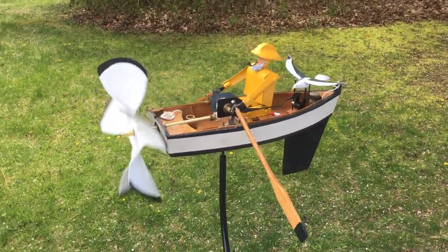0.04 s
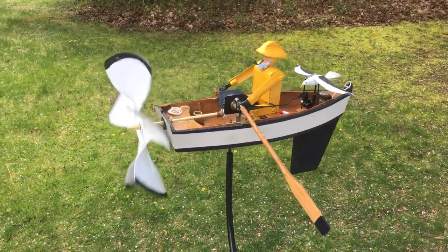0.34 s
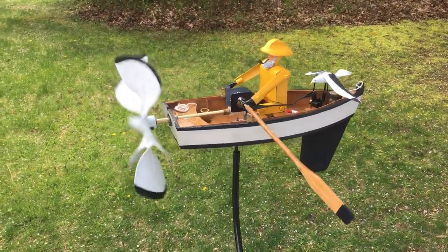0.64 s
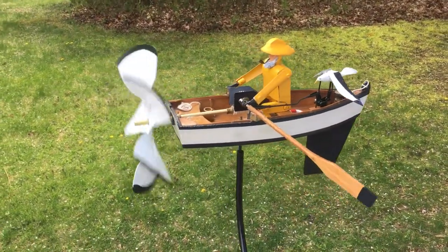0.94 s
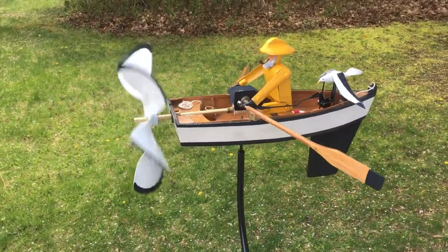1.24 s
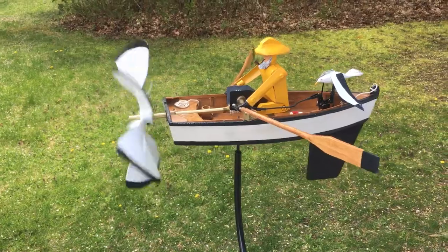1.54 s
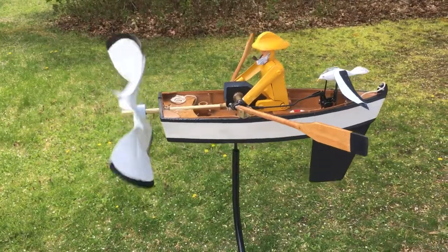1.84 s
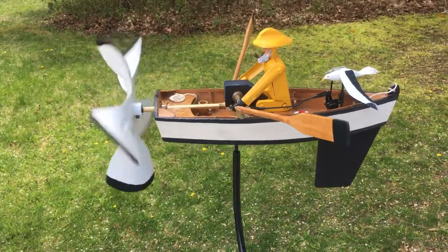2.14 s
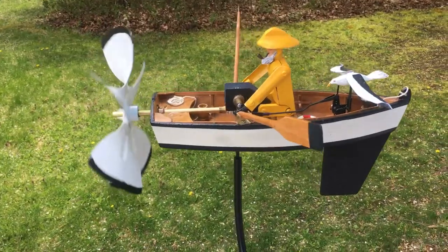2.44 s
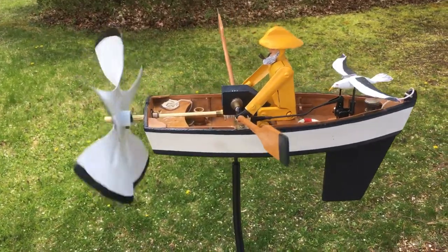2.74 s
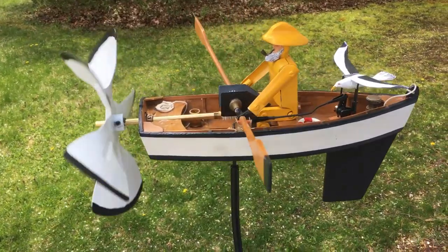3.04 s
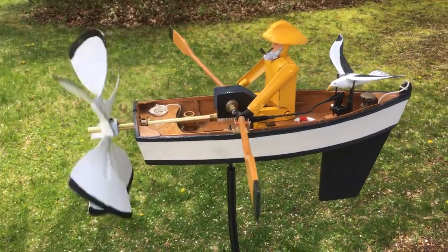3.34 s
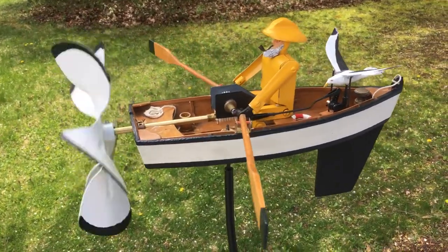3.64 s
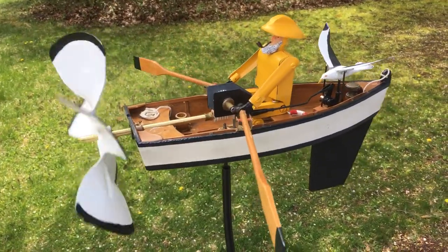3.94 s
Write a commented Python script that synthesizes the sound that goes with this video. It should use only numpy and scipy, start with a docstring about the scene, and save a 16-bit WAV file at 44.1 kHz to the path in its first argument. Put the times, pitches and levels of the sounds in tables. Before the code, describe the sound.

Gusty wind rumbles on the microphone, with faint ticks from a small wooden wind toy.

```python
"""On a lawn, one microphone in uneven wind: the harder it blows, the louder and brighter the rumble.
From the start a small wooden wind toy ticks faintly close by, with small birds and distant trees behind.
From 0.7 s single eddies slap the microphone's port, and near 1.4 s one sharp pop hits it.
Towards the end the wind eases and the tyre hiss of far traffic draws nearer."""
import sys
import numpy as np
from scipy import signal
from scipy.io import wavfile
from scipy.ndimage import uniform_filter1d

SR = 44100
rng = np.random.default_rng(int(sys.argv[2]) if len(sys.argv) > 2 else 0)


def dump_mix(stems):
    """Bounce the given channels to the path in sys.argv[1] as a 16-bit WAV at rate SR."""
    frames = np.atleast_2d(stems).T  # one column per channel
    limited = np.clip(frames, -1, 1)  # hard clip at full scale
    pcm = np.round(limited * 32767).astype(np.int16)
    wavfile.write(sys.argv[1], SR, pcm)


N = 176400
T = np.arange(N) / SR

# Buffeting and deep rumble on the microphone at mean wind: f/Hz, band level/dB
BUFFET_SPECTRUM = [(100, -35), (150, -23.5), (220, -25.5), (320, -34), (450, -52.5), (640, -65), (900, -66),
                   (1300, -78), (2000, -89.5)]
RUMBLE_SPECTRUM = [(28, -51), (40, -39), (56, -28.5), (80, -26.5), (113, -29), (160, -42.5), (230, -61)]
# Strength of the gusts and of the rumble, read against the means below: t/s, level/dB
GUST_CURVE = [(0.0, -34.5), (0.12, -28), (0.19, -41.5), (0.26, -26), (0.33, -33), (0.5, -23), (0.58, -38.5),
              (0.68, -19), (0.9, -18.5), (0.95, -35), (0.98, -20.5), (1.06, -14.5), (1.11, -31.5),
              (1.15, -12), (1.17, -30), (1.22, -17), (1.3, -25.5), (1.31, -21), (1.5, -19.5), (1.51, -13.5),
              (1.56, -21), (1.75, -18.5), (1.83, -48.5), (1.88, -21), (1.9, -31), (1.92, -18.5),
              (1.97, -40), (2.03, -21.5), (2.07, -34.5), (2.1, -31.5), (2.17, -15.5), (2.23, -33.5),
              (2.31, -47), (2.35, -19), (2.37, -28), (2.46, -21), (2.51, -30), (2.54, -24.5), (2.57, -41),
              (2.65, -17), (2.75, -30), (2.85, -13.5), (2.86, -21.5), (3.01, -23.5), (3.04, -46),
              (3.13, -24), (3.19, -37), (3.22, -24.5), (3.25, -48), (3.27, -20.5), (3.31, -21.5),
              (3.33, -34), (3.42, -19), (3.45, -35), (3.61, -44.5), (3.63, -27.5), (3.72, -55), (3.78, -23),
              (3.81, -44), (4.0, -77)]
RUMBLE_CURVE = [(0.0, -26.5), (0.14, -18), (0.19, -32), (0.26, -15.5), (0.3, -29.5), (0.43, -25.5),
                (0.49, -17), (0.59, -33.5), (0.63, -18.5), (0.78, -14.5), (0.96, -38.5), (0.98, -15.5),
                (1.07, -16), (1.18, -31.5), (1.25, -15.5), (1.28, -30.5), (1.35, -14), (1.48, -24),
                (1.53, -12), (1.59, -41.5), (1.65, -17.5), (1.68, -24.5), (1.73, -11), (1.83, -35),
                (1.88, -17), (1.98, -28.5), (2.02, -14), (2.05, -28), (2.24, -19), (2.27, -28),
                (2.41, -22.5), (2.44, -29), (2.47, -15), (2.55, -22.5), (2.68, -21), (2.74, -21),
                (2.83, -12), (3.0, -20), (3.04, -27.5), (3.16, -17.5), (3.25, -30.5), (3.27, -20.5),
                (3.34, -26), (3.42, -16), (3.49, -30), (3.62, -28), (3.66, -20), (3.71, -35), (3.91, -25.5),
                (4.0, -42.5)]
MEAN_GUST_DB, MEAN_RUMBLE_DB = -20, -22.5
# Single eddies on the port: t/s, relative level/dB, f/Hz, roundness (rounder has less treble)
EDDY_SLAPS = [(.667, -26.5, 420, 5.5), (.7635, -17, 608, 27), (0.785, -10.5, 320, 3.4),
              (0.857, -21, 400, 6.7), (0.982, -19, 380, 8.2), (1.006, -14, 580, 4.4),
              (1.046, -11, 430, 6.6), (1.086, -19, 400, 11), (1.139, -18.5, 450, 6.2),
              (1.195, -18, 440, 5.3), (1.365, -16.5, 345, 5.6), (1.483, -19, 440, 60),
              (1.518, -13, 500, 5.4), (1.625, -13.5, 480, 4.8), (1.633, -13, 416, 10), (1.743, -18, 480, 4),
              (1.757, -15, 360, 21), (1.918, -21, 400, 9), (2.027, -19.5, 426, 7.6),
              (2.147, -26.5, 420, 4.5), (2.346, -25, 425, 6.5), (2.655, -18, 480, 6.5),
              (2.845, -13.5, 330, 1.73), (2.992, -21.5, 420, 7), (3.49, -32, 342, 5),
              (3.603, -32, 268, 8.3), (3.795, -36, 376, 5)]

# Dry ticks of the toy's crank, close by: t/s, relative level/dB
CRANK_TICKS = [(.043, -45), (.215, -50.5), (.289, -51), (.389, -53), (.457, -49), (.577, -51),
               (.705, -52.5), (.881, -51.5), (1.703, -51), (1.8904, -35.5), (2.03, -52), (2.110, -48),
               (2.234, -52), (2.307, -54), (2.428, -46.5), (2.738, -47), (3.211, -49), (3.359, -48.5),
               (3.471, -50), (3.634, -51), (3.748, -54), (3.762, -48.5), (3.843, -56), (3.914, -46)]
# Ringing of the crank: f/Hz, relative level/dB, t60/s
CRANK_RESONANCES = [(5600, -25, 0.027), (7100, -18, 0.017), (8100, -16, 0.0067), (11100, -17, 0.014),
                    (13100, -23.5, .012)]
# Duller knocks of its wooden parts: t/s, relative level/dB, f/Hz
WOOD_KNOCKS = [(.892, -42, 5000), (.935, -51, 4200), (1.016, -49, 3400), (1.956, -41.5, 2700),
               (2.211, -39, 2200), (3.094, -49, 3300), (3.242, -48, 4200)]
# Colours of a tick, a knock and a rub: f/Hz, relative band level/dB
TICK_SPECTRUM = [(2000, -18.5), (3500, 1.5), (5500, -3), (8000, -4.5), (10000, -2.5), (13000, 0),
                 (16000, -17.5)]
KNOCK_SPECTRUM = [(1000, -5.5), (2000, 0), (3200, 5), (4500, -3), (7000, 0.5), (15000, 0)]
RUB_SPECTRUM = [(7000, -3), (11000, -5), (16000, -14.5)]
# Hiss of the shaft in its bearing: t/s, level/dB
SHAFT_CURVE = [(0, -78), (1.7, -79.5), (2.1, -78.5), (2.6, -77.5), (3.3, -80.5), (4, -79.5)]

# A bird's sharp chips, further off: t/s, level/dB
BIRD_CHIPS = [(1.034, -57.5), (1.522, -60.5), (3.526, -57), (3.91, -53.5)]
# Thin bird whistles: t/s, length/s, start f/Hz, end f/Hz, level/dB
BIRD_WHISTLES = [(0.049, .07, 7400, 4500, -63.5), (.105, .045, 4550, 4620, -67.5),
                 (1.561, 0.085, 6540, 5800, -73), (1.763, 0.034, 6400, 7400, -70),
                 (3.125, 0.067, 3350, 3190, -67), (3.573, 0.049, 3700, 3850, -65),
                 (3.637, 0.051, 4900, 4060, -71)]
# Hush of the distant trees: f/Hz, band level/dB
TREES_SPECTRUM = [(100, -52.5), (400, -74.5), (700, -71), (1000, -59.5), (1400, -56.5), (2000, -67.5),
                  (2800, -70.5), (4000, -75.5), (6000, -79), (8000, -84), (11000, -85), (16000, -78)]
# Its slow swell: t/s, relative level/dB
TREES_SWELL = [(0, 1.6), (.8, -1.3), (1.7, 1.2), (2.5, -0.34), (3.2, -0.32), (4, 1.8)]
# Far traffic drawing nearer: t/s, level/dB
TRAFFIC_CURVE = [(0, -67.5), (2.5, -65.5), (3.1, -59.5), (3.6, -60), (4, -54.5)]


def wind(lull_db=-22, brighten_per_octave=.24):
    """Turbulence on the port: a deep rumble, and fluttering buffets that brighten as the wind rises."""
    rumble = coloured(RUMBLE_SPECTRUM)
    rumble *= steadying(rumble, window_s=.05) * from_db(in_time(RUMBLE_CURVE) - MEAN_RUMBLE_DB)
    gust = from_db(in_time(GUST_CURVE) - MEAN_GUST_DB)
    gust_db = 20 * np.log10(np.hypot(gust, from_db(lull_db)))   # some wind stays between gusts
    flutter_db = 1.5 * drift(25)
    steady = buffet = 0
    for hz, db, noise in noise_bands(BUFFET_SPECTRUM):
        octaves = np.log2(hz / 430)
        swing_db = gust_db * (1.5 + brighten_per_octave * octaves)   # upper bands swing further
        steady += from_db(db) * noise
        buffet += from_db(db + swing_db + flutter_db * max(octaves, 0)) * noise
    buffet *= steadying(steady, window_s=.039)
    return filtered(rumble, 260, "low", order=4) + filtered(buffet, 1500, "low", order=4)


def small_eddies(per_s=110, mean_wind_db=-45.5, steepness=1.72):
    """Little eddies of uneven size tumble past the microphone and make each gust ragged."""
    born = rng.random(N) < per_s / SR
    kicks = born * rng.choice([-1, 1], N) * rng.uniform(.23, 1, N)
    swings = filtered(filtered(kicks, 293, "high"), 520, "low", order=5)
    gust_db = np.minimum(in_time(GUST_CURVE) - MEAN_GUST_DB, 6)
    return rms_one(swings) * from_db(mean_wind_db + steepness * gust_db)


def slaps(trim_db=-1.5):
    """An eddy hitting the port is one pointed swing of pressure; smaller eddies sound higher."""
    out = 0
    for s, db, hz, roundness in EDDY_SLAPS:
        phase = rng.uniform(0, 2 * np.pi)
        swing = (1 - 2j * np.pi * (T - s) * hz / roundness) ** -(roundness + 1)
        out += from_db(db + trim_db) * np.real(swing * np.exp(1j * phase))
    return out


def pop(at_s=1.387, db=-16.5):
    """One sudden pressure step right at the microphone."""
    return -filtered(decays([(at_s, db)], decay_s=.0008), 80, "high", order=1)


def crank(tiny_per_s=18, count=200):
    """Close by, the toy's crank ticks and rings briefly, with a scatter of tinier ticks between."""
    tiny_s = np.cumsum(rng.exponential(1, count)) / tiny_per_s
    tiny_db = rng.normal(-58, 2, count)
    tiny = np.column_stack([tiny_s, tiny_db])[tiny_s < N / SR]
    ticks = np.vstack([CRANK_TICKS, tiny])
    snap = from_db(-6.5) * decays(ticks, decay_s=.0016) * rms_one(coloured(TICK_SPECTRUM))
    clicks = decays(ticks, decay_s=.1 / SR)   # one sample wide
    return snap + sum(from_db(db) * ring(clicks, hz, t60) for hz, db, t60 in CRANK_RESONANCES)


def knocks(decay_cycles=16, trim_db=-9):
    """Wood on wood in the toy: short bursts, each around its own pitch; lower ones last longer."""
    wood, out = coloured(KNOCK_SPECTRUM), 0
    for s, db, hz in WOOD_KNOCKS:
        body = rms_one(filtered(wood, [hz / 1.5, hz * 1.1], "band", order=1))
        out += body * decays([(s, db + trim_db)], decay_cycles / hz)
    return out


def rub(at_s=1.09, width_s=.029, db=-69):
    """One wooden part brushes past another, brief and grainy."""
    stroke = np.exp(-.5 * ((T - at_s) / width_s) ** 2)
    return from_db(db + 3 * drift(150)) * stroke * rms_one(coloured(RUB_SPECTRUM))


def shaft(centre_hz=8130, width_hz=2500):
    """The toy's turning shaft hisses faintly in its bearing."""
    bearing = hiss(centre_hz - width_hz / 2, centre_hz + width_hz / 2)
    return bearing * from_db(in_time(SHAFT_CURVE) + .83 * drift(12))


def bird_note(start, length_s, start_hz, end_hz, db, rough, rasp_per_s):
    """A bird's wavering glide, fast at first and then levelling off."""
    progress = np.clip((T - start) / length_s, 0, 1)
    hz = end_hz + (start_hz - end_hz) * (1 - progress) ** 2.1
    hz *= 1 + rough * drift(rasp_per_s)
    envelope = np.sqrt(np.abs(np.sin(np.pi * progress)))
    return from_db(db) * envelope * np.sin(2 * np.pi * np.cumsum(hz) / SR)


def birds(trees_t60_s=.22, chip_echo_db=2):
    """Raspy chips and thin whistles from further off, heard directly and scattered by the trees."""
    chips = sum(bird_note(s, length_s=.029, start_hz=5590, end_hz=3340, db=db, rough=.28, rasp_per_s=1300)
                for s, db in BIRD_CHIPS)
    whistles = sum(bird_note(*row, rough=.018, rasp_per_s=270) for row in BIRD_WHISTLES)
    echoes = rng.standard_normal(SR) * from_db(-60 * T[:SR] / trees_t60_s)
    echoes /= np.linalg.norm(echoes)
    scattered = signal.fftconvolve(from_db(chip_echo_db) * chips + whistles, echoes)[:N]
    return chips + whistles + scattered


def far_trees():
    """The smooth hush of trees in the distance."""
    return from_db(in_time(TREES_SWELL)) * coloured(TREES_SPECTRUM)


def far_traffic():
    """The narrow hiss of far tyres swells towards the end."""
    return from_db(in_time(TRAFFIC_CURVE)) * hiss(low_hz=930, high_hz=1430)


def from_db(db):
    """Decibels to gain."""
    return 10 ** (np.asarray(db) / 20)


def rms_one(x):
    """Scale to an rms of one."""
    return x / np.sqrt(np.mean(x ** 2) + 1e-20)


def in_time(curve):
    """A level curve at every sample."""
    return np.interp(T, *np.transpose(curve))


def filtered(x, hz, kind, order=2):
    """Butterworth filter."""
    return signal.sosfilt(signal.butter(order, hz, kind, fs=SR, output="sos"), x + 1e-18)


def hiss(low_hz, high_hz):
    """One band of noise with an rms of one."""
    return rms_one(filtered(rng.standard_normal(N), [low_hz, high_hz], "band"))


def drift(rate_hz, step=40, run_in=2000):
    """A smooth random wander with a spread of one."""
    pole = np.exp(-2 * np.pi * rate_hz * step / SR)
    noise = rng.standard_normal(N // step + run_in + 2)
    slow = signal.lfilter([1], [1, -2 * pole, pole * pole], noise)[run_in:]
    return np.interp(np.arange(N) / step, np.arange(len(slow)), rms_one(slow))


def noise_bands(spectrum):
    """Half-octave bands across a spectrum: f/Hz, level/dB, noise with an rms of one."""
    freqs, levels = np.transpose(spectrum)
    for hz in 28 * 2 ** np.arange(0, 9.6, .5):
        if freqs[0] / 1.2 < hz < freqs[-1] * 1.2:
            edges = [hz / 2 ** .25, min(hz * 2 ** .25, .48 * SR)]
            noise = filtered(rng.standard_normal(N + SR // 2), edges, "band")[-N:]
            yield hz, np.interp(np.log(hz), np.log(freqs), levels), rms_one(noise)


def coloured(spectrum):
    """Steady noise with the given band levels."""
    return sum(from_db(db) * noise for _, db, noise in noise_bands(spectrum))


def steadying(x, window_s):
    """The gain that takes the chance swells out of a noise."""
    size = int(window_s * SR)
    power = uniform_filter1d(uniform_filter1d(rms_one(x) ** 2, size), size)
    return 1 / np.sqrt(power + 1e-3)


def decays(rows, decay_s):
    """An envelope that jumps at each row (t/s, level/dB) and dies away."""
    s, db = np.transpose(rows)
    kicks = np.zeros(N)
    np.add.at(kicks, (s * SR).astype(int), from_db(db))
    return signal.lfilter([1], [1, -np.exp(-1 / (decay_s * SR))], kicks + 1e-18)


def ring(clicks, hz, t60):
    """A unit click sets a sine of height one ringing."""
    pole, angle = from_db(-60 / (t60 * SR)), 2 * np.pi * hz / SR
    return signal.lfilter([0, np.sin(angle)], [1, -2 * pole * np.cos(angle), pole * pole], clicks + 1e-18)


def scene():
    """One microphone on the lawn: wind on the port, the toy close by, birds and hush behind."""
    on_port = wind() + small_eddies() + slaps() + pop()
    toy = crank() + knocks() + rub() + shaft()
    return (on_port + toy + birds() + far_trees() + far_traffic())[None]


def record(dry, dip_hz=10550, dip_depth=.23):
    """The microphone dips in the treble and loses the lowest bass and the top; peaks clip at full scale."""
    notched = signal.lfilter(*signal.iirnotch(dip_hz, Q=9, fs=SR), dry)
    dipped = dry + dip_depth * (notched - dry)
    clipped = np.clip(filtered(dipped, 40, "high", order=4), -1, 1)
    return signal.sosfilt(signal.cheby2(16, 70, 16600, fs=SR, output="sos"), clipped)


dry = scene()
out = record(dry)
dump_mix(out)
```